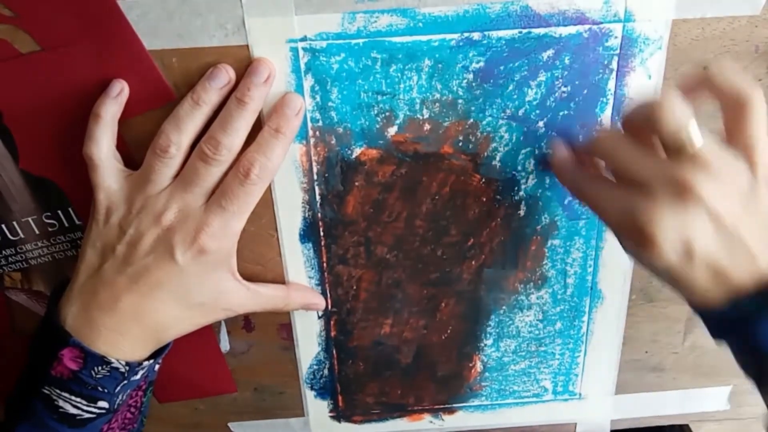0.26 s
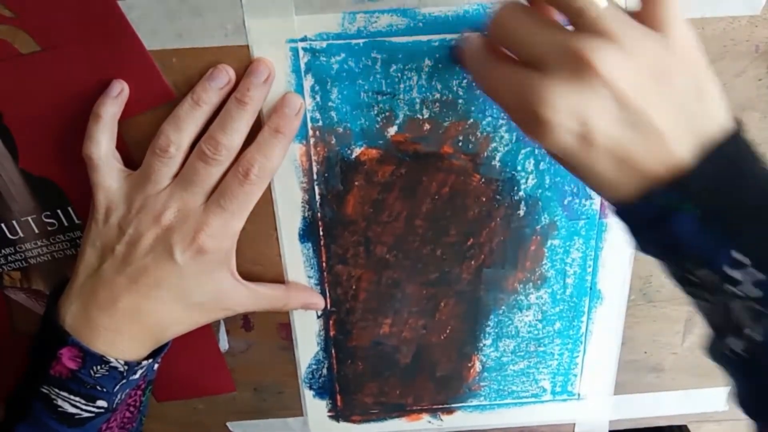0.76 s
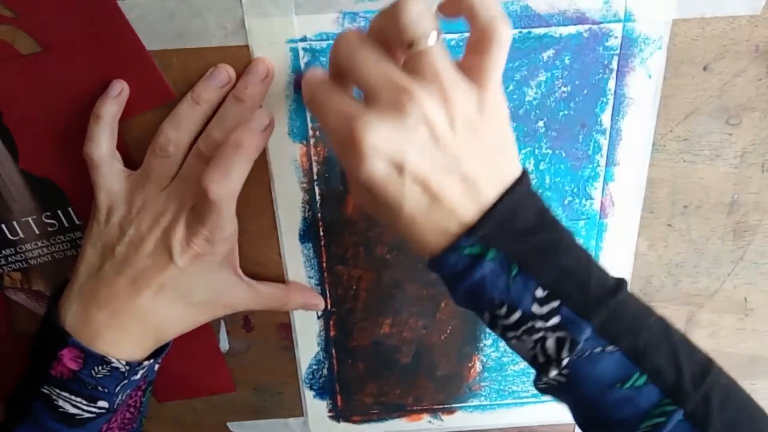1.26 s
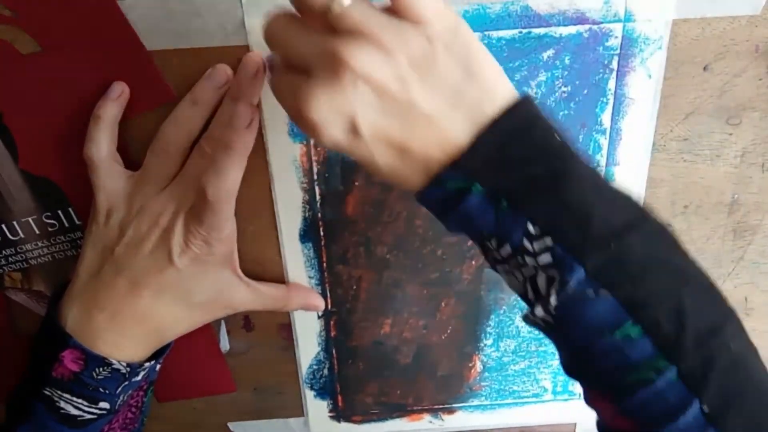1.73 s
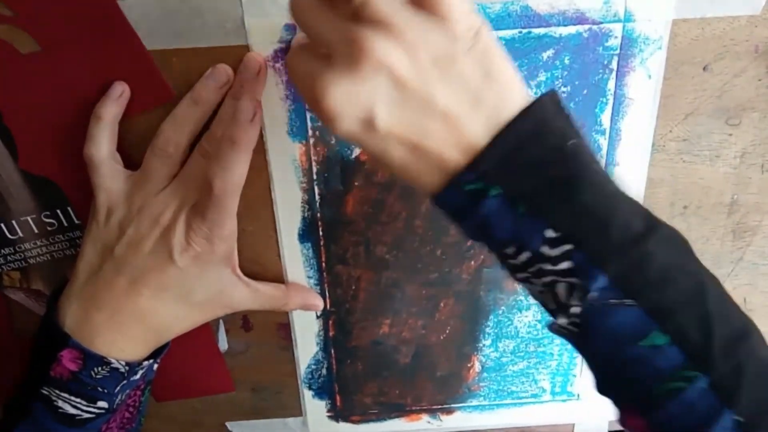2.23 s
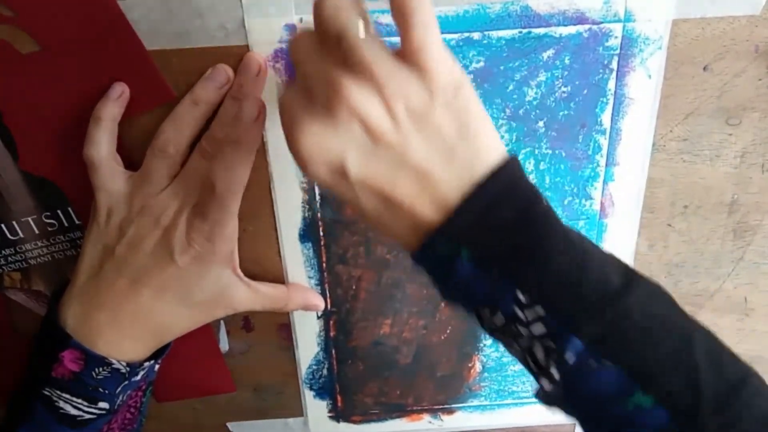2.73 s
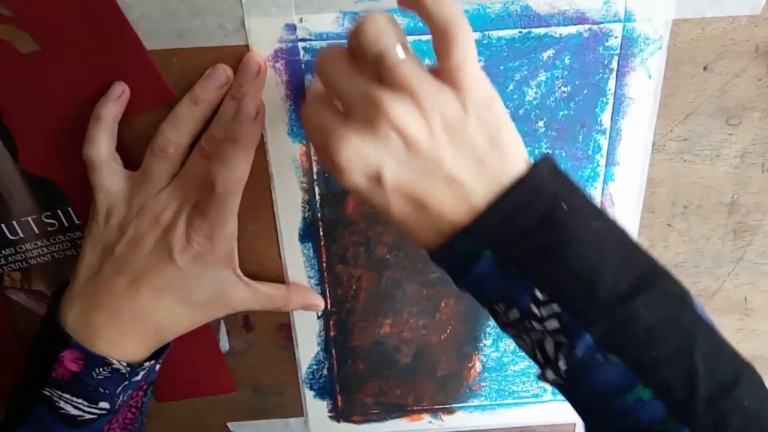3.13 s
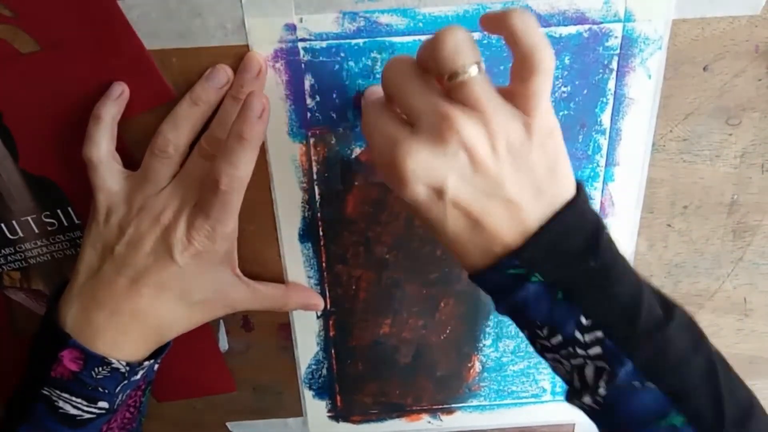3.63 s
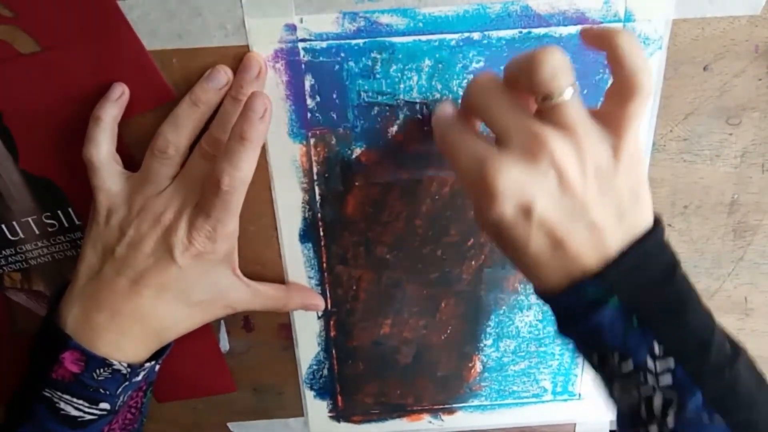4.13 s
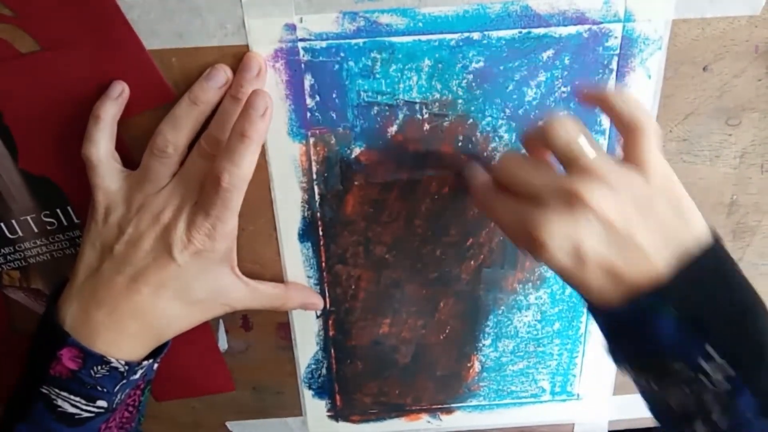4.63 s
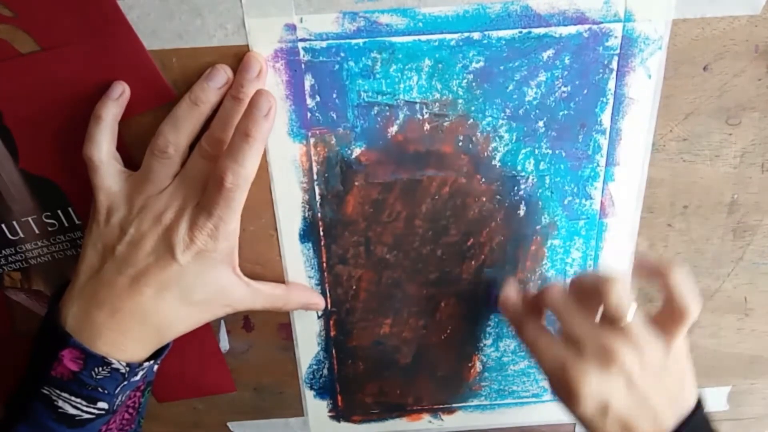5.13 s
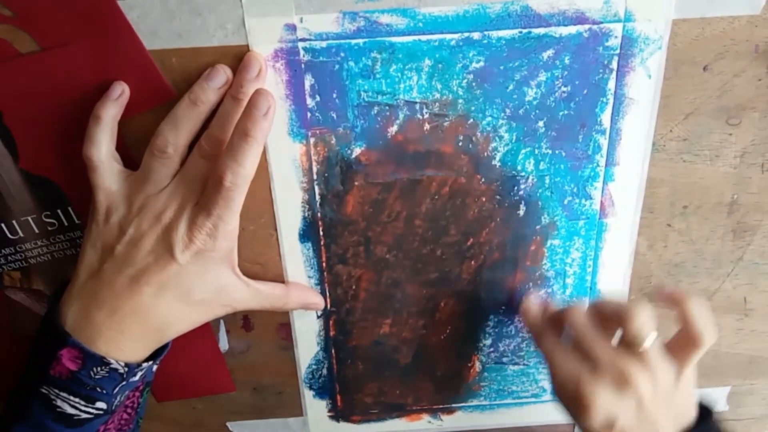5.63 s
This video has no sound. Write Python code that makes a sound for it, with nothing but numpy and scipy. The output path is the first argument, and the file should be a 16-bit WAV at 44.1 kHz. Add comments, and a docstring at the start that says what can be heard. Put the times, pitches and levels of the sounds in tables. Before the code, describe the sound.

A pastel stick scrubs quickly to and fro on paper, with a dry hiss and soft drumming from the wooden table.

```python
"""Close up at a wooden table in a small room, one microphone. A pastel stick scrubs to and fro over
taped-down paper, about seven strokes a second. The paper's tooth crumbles it in a fine hiss that the
moving hand colours; with each push the sheet scuffs and the table top drums and rings. Now and then
the stick knocks at a ridge of pigment. The strokes ease around three seconds, then move towards the
table's edge, where the last are the hardest and the stick clicks, twice faintly and once sharply."""
import sys
import numpy as np
from scipy import signal
from scipy.fft import rfft, irfft, next_fast_len
from scipy.io import wavfile
from scipy.ndimage import uniform_filter1d

SR = 44100
rng = np.random.default_rng(int(sys.argv[2]) if len(sys.argv) > 2 else 0)


def dump_mix(stems):
    """Bounce the given channels to the path in sys.argv[1] as a 16-bit WAV at rate SR."""
    frames = np.atleast_2d(stems).T  # one column per channel
    limited = np.clip(frames, -1, 1)  # hard clip at full scale
    pcm = np.round(limited * 32767).astype(np.int16)
    wavfile.write(sys.argv[1], SR, pcm)


N = 258867

# Strokes, each lasting until the hand's next turn; where the hiss hardly dips, the stick runs on.
# Each row: turn in seconds, dip of the hiss there in dB, hardest push as a share of the stroke,
# then relative levels in dB of hiss, table drum, hollow knock, scuff and rumble.
STROKES = [(0.0, -9.5, 0.09, -64, -42.5, -49, -61, -56.5), (0.054, -3, 0.3, -63.5, -49.5, -58, -71.5, -52),
           (0.18, 8.5, 0.7, -60, -49, -52.5, -58, -54),
           (0.271, -2.5, 0.03, -64.5, -43.5, -55.5, -65, -48.5),
           (0.489, 10, 0.48, -65.5, -51.5, -56, -62.5, -57), (0.655, 8, 0.78, -66, -46, -55.5, -71, -48),
           (0.79, -2, 0.07, -67.5, -51, -53.5, -68, -51.5), (0.933, 0.5, .4, -69.5, -55, -54.5, -74, -67.5),
           (1.047, 14.5, 0.59, -65.5, -48, -59, -71.5, -61.5),
           (1.141, 3, 0.44, -66, -52, -50.5, -61.5, -74),
           (1.289, 10.5, 0.7, -69, -44.5, -52.5, -68.5, -48.5),
           (1.412, 7, 0.34, -64, -47, -49.5, -61.5, -56), (1.583, 11.5, 0.6, -64, -45.5, -53, -70.5, -62),
           (1.744, 7.5, 0.47, -67.5, -52.5, -55.5, -66.5, -56.5),
           (1.894, 11, 0.66, -65, -52.5, -52.5, -63, -48), (2.042, 8, 0.47, -65, -52.5, -53.5, -63.5, -67),
           (2.155, 4, 0.44, -67, -61.5, -57.5, -68, -71), (2.251, 6, 0.39, -65.5, -50, -48.5, -72, -60.5),
           (2.42, 19.5, 0.49, -65, -45, -54.5, -68.5, -56),
           (2.547, 10.5, 0.38, -68.5, -52, -59.5, -73.5, -54),
           (2.673, 14, 0.38, -64, -54.5, -59.5, -75, -61.5), (2.815, 10, 0.37, -69.5, -55, -54, -77, -77),
           (2.953, 12.5, 0.6, -71.5, -55, -60.5, -78.5, -79),
           (3.095, 7, 0.87, -74.5, -62.5, -78, -77.5, -67), (3.254, 6, 0.49, -64.5, -59.5, -76, -73, -65),
           (3.396, 14, 0.5, -65.5, -44, -51, -67, -57.5), (3.542, 17, 0.42, -63.5, -48, -46.5, -62, -52.5),
           (3.671, 11.5, .44, -67, -53.5, -47.5, -64, -53), (3.803, 10, 0.44, -63, -45.5, -47, -62, -54.5),
           (3.933, 3.5, 0.35, -66.5, -49, -50.5, -69.5, -55.5), (4.079, 4, 0.47, -66, -49, -61, -67, -59.5),
           (4.199, 4, 0.47, -67.5, -49, -62.5, -72, -54), (4.385, 14, 0.62, -64, -43, -62.5, -61.5, -46.5),
           (4.545, 13, .55, -62, -37, -45, -54.5, -44), (4.756, 16, 0.59, -63, -40.5, -59, -66.5, -54.5),
           (4.881, 7.5, 0.55, -62.5, -44.5, -49, -56, -54), (5.095, 4, .55, -61, -45, -50, -59, -54.5),
           (5.242, 16.5, 0.46, -58.5, -41.5, -40, -52, -50.5),
           (5.436, 9, 0.49, -57, -47.5, -44.5, -53.5, -45.5), (5.586, 9.5, 0.34, -59, -49, -47, -58.5, -55)]
# Swell and release within a push, for drum, hollow knock, scuff and rumble. Each row: delay, then rise
# and fall before stretching, all in seconds, roundness of the rise and of the fall (1 spike, 2 bell).
PUSH_SHAPES = [(-0.00046, 0.031, 0.045, 2.4, 1.35), (-0.0019, .033, .038, 2.3, 1.78),
               (-0.0016, 0.029, 0.041, 1.56, 1.24), (0.0048, .048, 0.06, 2.4, 1.9)]
# The stick's path over the sheet. Each row: time in seconds, place from 0 (far end) to 1 (table's edge).
STICK_PATH = [(0, 0.46), (.3, 0.59), (.7, 0.22), (1.5, 0.31), (2.5, 0.079), (3.3, 0.16), (3.7, 0.35),
              (4.2, 0.22), (4.6, 0.62), (5.0, 0.76), (5.87, 0.84)]

# The pigment's fine hiss; apart from that, the rows above 13900 Hz add a faint, very high fizz.
# Each row: frequency in Hz, relative level in dB.
HISS_SPECTRUM = [(2500, -42), (4000, -18), (4900, -0.5), (5450, -0.5), (5780, 1.5), (6400, -2.5),
                 (6900, -14), (7500, -24.5), (8200, -34), (13900, -35.5), (15000, -27.5), (15700, -17)]
# The coarse rasp under the hiss. Each row: frequency in Hz, relative level in dB.
RASP_SPECTRUM = [(600, -12.5), (1200, -21), (1750, -6.5), (2150, -10.5), (2600, -4), (3300, 3.5), (3900, 5),
                 (4600, 0), (5600, -5), (7500, -51.5)]
# A thin ring that comes and goes with the stick's angle. Each row: time in seconds, dB against the hiss.
WHISTLE_LEVELS = [(0, -18), (1.9, -18.5), (2.8, -31.5), (3.8, -26), (4.05, -10), (4.3, -16), (4.7, -26.5),
                  (5.87, -20)]
# Reflections off hand, arm and table. Each row: delay in seconds, its swing in seconds, level in dB.
HAND_REFLECTIONS = [(.0004, 0.000085, -6), (.0009, 0.000053, -11), (.0017, 0.00014, -4.5),
                    (.0029, 0.00019, -5.5), (.0046, 0.00027, -8.5)]

# The stick bites into the paper after a turn, knocks at ridges of pigment, and clicks.
# Each row: time in seconds, relative strength in dB.
PAPER_BITES = [(1.062, -59), (1.3017, -52), (1.7567, -58), (2.452, -58), (3.273, -69), (3.69, -53),
               (5.3056, -70)]
RIDGE_KNOCKS = [(0.254, -23), (1.083, -32), (1.355, -29), (1.819, -35), (1.935, -25), (2.469, -26.5),
                (3.841, -24.5), (4.45, -40.5), (4.631, -17.5), (4.65, -26), (4.67, -22.5), (5.178, -39)]
STICK_CLICKS = [(4.512, -51), (4.534, -51.5), (5.1448, -43.5)]

# Resonances. Each row: frequency in Hz, relative level in dB, time to fall 60 dB in seconds.
SHEET_MODES = [(470, 2, 0.11), (540.2, 4, 0.2), (578, -0.5, 0.13), (663.4, -5.5, 0.11), (712, -11, 0.1),
               (801.6, -6.5, 0.1), (921, -11, 0.064), (1091, -8.5, 0.033), (1164, -11.5, 0.038),
               (1261, -15, 0.041), (1514, -15.5, 0.032), (1790, -10, 0.0092)]  # the sheet against the wood
TABLE_MODES = [(113, -10, 0.07), (133.8, -6.5, 0.12), (160.9, -5.5, 0.28), (193.8, -3.5, .09),
               (211.2, -2.5, 0.34), (225.3, -5.5, 0.091)]  # the low ring of the table top
FAR_MODES = [(275.7, 1, 0.16), (289.9, 0.5, 0.13), (340.3, -11.5, .09), (398, -19, 0.063)]  # its hollow upper modes, reached from the far end
EDGE_MODES = [(318.3, 0.5, 0.098), (344.6, 1, 0.18), (364, -4, 0.14), (402.3, -8, 0.11)]  # those reached from the edge
LINGERING_MODES = [(160, -14, 0.53), (210, -2.5, 0.5)]  # its slowest to die, singing on between strokes
STICK_MODES = [(1172, 0, 0.041), (1283, 3.5, 0.017), (1700, -10, 0.03)]  # the pastel stick itself

# The rocking table and the room's air. Each row: frequency in Hz, relative level in dB.
RUMBLE_SPECTRUM = [(20, -36), (36, -20), (50, -7.5), (60, 3.5), (70, -5), (84, 3.5), (101, -13.5),
                   (118, -3), (150, -18.5), (250, -28.5), (800, -77)]
AIR_SPECTRUM = [(20, -12.5), (60, 6.5), (160, -4.5), (300, -4), (600, -17.5), (1500, -18), (5000, -36),
                (8000, -34), (15700, -33)]

LAST_STROKE_END_S, LAST_DIP_DB = 5.83, 15
CREST_PLACE, CREST_FOLLOWS_PUSH = .42, .45  # the hand is fastest here in a stroke, drawn towards the push
PUSH_STRETCH, EASE_DB, EASE_SPEED = 0.74, 2, .25  # stretch is an exponent; the hand eases at low speed
RASP_DB, RASP_FOLLOWS_SCUFF, RASP_TURN_DIP_DB, RASP_LAG_S = -5.0, 0.3, 4, .004
WHISTLE_HZ, WHISTLE_T60_S = 2903, 0.0064
ROCK_DB, ROCK_T60_S, ROCK_LOW_CUT_HZ = 0.76, 0.13, 38
ROOM_T60_S, AIR_DB, CUTOFF_HZ = 0.14, -75.5, 15750


def pastel(speed, hiss_db, rasp_db):
    """Pigment breaks off on the paper's tooth; a faster stick meets more fibres a second."""
    crumbs = hand_reflections(grains(per_s=2200 + 6000 * speed, spread_db=3.5))
    flakes = hand_reflections(grains(per_s=1600 + 4500 * speed, spread_db=4.5))
    # a bite throws off a burst of crumbs that thins out at once
    bite_s = 0.01
    bite = signal.lfilter([1], [1, -np.exp(-1 / (bite_s * SR))], blows(PAPER_BITES))
    hiss_gain = from_db(hiss_db + 0.5) + from_db(-12.0) * bite
    hiss = hiss_gain * steadied(coloured(crumbs, HISS_SPECTRUM), span_s=0.12)
    rasp = from_db(rasp_db - 1.1) * steadied(coloured(flakes, RASP_SPECTRUM), span_s=0.23)
    whistle = steadied(ring(flakes, WHISTLE_HZ, WHISTLE_T60_S), span_s=0.33)
    return hiss + rasp + from_db(hiss_db + in_time(WHISTLE_LEVELS)) * whistle


def hand_reflections(x):
    """Each turn leaves the hand in a new pose, so its reflections comb the hiss differently."""
    turn_s, _ = stroke_spans()
    samples, out = np.arange(N), x
    # a pose holds from just after one turn to just before the next
    held_s = np.column_stack([turn_s + .012, np.append(turn_s[1:], N / SR + 1) - .012]).ravel()
    for delay_s, swing_s, db in HAND_REFLECTIONS:
        pose = np.repeat(rng.uniform(-1.18, 1, len(turn_s)), 2)
        lag = (delay_s + swing_s * np.interp(samples / SR, held_s, pose)) * SR
        out = out + from_db(db) * np.interp(samples - lag, samples, x)
    return out


def stroke_motion():
    """The hand speeds up and slows between turns; gives speed 0-1 and hiss and rasp levels in dB."""
    _, dip_db, push_place, crest_db, _, _, scuff_db, _ = np.transpose(STROKES)
    turn_s, length_s = stroke_spans()
    t, middle_s = np.arange(N) / SR, turn_s + length_s / 2
    stroke = np.maximum(np.searchsorted(turn_s, t, "right") - 1, 0)
    progress = np.clip((t - turn_s[stroke]) / length_s[stroke], 0, 1)
    crest = CREST_PLACE + CREST_FOLLOWS_PUSH * (push_place - CREST_PLACE)
    skew = np.log(.5) / np.log(np.clip(crest, .1, .9))  # puts the sine's top at the crest
    speed = np.sin(np.pi * progress ** skew[stroke])
    dips_db = np.interp(t, np.append(turn_s, LAST_STROKE_END_S), np.append(dip_db, LAST_DIP_DB))
    turn_db = np.interp(t, middle_s, crest_db) - dips_db
    hiss_db = (1 - speed) * turn_db + speed * crest_db[stroke]
    # the rasp grows with hard scuffing, dies further at the turns and lags while the stick digs in
    coarse_db = RASP_DB + RASP_FOLLOWS_SCUFF * np.interp(t, middle_s, scuff_db - crest_db)
    rasp_db = hiss_db + coarse_db - RASP_TURN_DIP_DB * (1 - speed)
    return speed, hiss_db, np.interp(t - RASP_LAG_S, t, rasp_db)


def push_gains(speed):
    """The hand bears down once a stroke and eases at the turns; gains of drum, hollow, scuff, rumble."""
    _, _, place, _, *levels_db = np.transpose(STROKES)
    turn_s, length_s = stroke_spans()
    place = np.clip(place, .1, .9)
    t = np.arange(0, N, step=64) / SR
    # a push stretches with the time it has on either side of its peak
    before, after = (2 * length_s * np.array([place, 1 - place]) / np.median(length_s)) ** PUSH_STRETCH
    easing = from_db(-EASE_DB * np.exp(-speed / EASE_SPEED))
    gains = []
    for peak_db, (delay_s, rise_s, fall_s, rise_round, fall_round) in zip(levels_db, PUSH_SHAPES):
        since_s = t[:, None] - (turn_s + place * length_s + delay_s)
        width_s = np.where(since_s < 0, rise_s * before, fall_s * after)
        roundness = np.where(since_s < 0, rise_round, fall_round)
        power = np.exp(-2 * np.abs(since_s / width_s) ** roundness) @ from_db(peak_db) ** 2
        gains.append(easing * in_time(np.column_stack([t, np.sqrt(power)])))
    return gains


def stroke_spans():
    """Start and length of every stroke in seconds."""
    turn_s = np.array(STROKES)[:, 0]
    return turn_s, np.diff(np.append(turn_s, LAST_STROKE_END_S))


def sheet(speed, scuff, edge):
    """Coarser slips shake the sheet against the wood; near the edge its high modes answer more."""
    shaking = struck(grains(per_s=600 + 1200 * speed, spread_db=1.0), SHEET_MODES)
    bright = signal.sosfilt(signal.butter(2, 950, "high", fs=SR, output="sos"), shaking)
    mix = (1 - edge) * rms_one(shaking) + from_db(-2.5) * edge * rms_one(bright)
    return from_db(0.15) * scuff * steadied(mix, span_s=0.035)


def table_top(speed, drum, hollow, edge):
    """The bumping stick drums on the table top and knocks it at ridges of pigment."""
    bumps = grains(per_s=300 + 600 * speed, spread_db=2.0)
    drumming = from_db(0.76) * drum * steadied(struck(bumps, TABLE_MODES), span_s=0.017)
    # which upper modes answer depends on where the stick presses
    upper = (1 - edge) * struck(bumps, FAR_MODES) + edge * struck(bumps, EDGE_MODES)
    knocking = from_db(0.64) * hollow * steadied(upper, span_s=0.033)
    lingering = steadied(struck(rng.standard_normal(N), LINGERING_MODES), span_s=0.037)
    singing = from_db(-2.0) * stored(drum, t60=LINGERING_MODES[-1][2]) * lingering
    ridges = from_db(-13.0) * struck(blows(RIDGE_KNOCKS), TABLE_MODES)
    return drumming + knocking + singing + ridges


def stick_clicks():
    """Small blows set the stick itself ringing briefly."""
    return from_db(-8.5) * struck(blows(STICK_CLICKS), STICK_MODES)


def table_rocking(weight):
    """The arm's weight rocks the whole table in a low rumble that outlasts each push."""
    low_noise = steadied(coloured(rng.standard_normal(N), RUMBLE_SPECTRUM), span_s=0.018)
    rumble = from_db(ROCK_DB) * stored(weight, ROCK_T60_S) * low_noise
    return signal.sosfilt(signal.butter(3, ROCK_LOW_CUT_HZ, "high", fs=SR, output="sos"), rumble)


def room(x, wet_db):
    """Dense reflections from near walls reach the microphone after the direct sound and die quickly."""
    t = np.arange(SR // 3) / SR
    tail = rng.standard_normal(len(t)) * from_db(-60 * t / ROOM_T60_S) * (t > .003)
    return x + from_db(wet_db) * signal.fftconvolve(x, tail / np.linalg.norm(tail))[:N]


def room_air():
    """Room tone: the quiet air as a steady, mostly low noise."""
    return from_db(AIR_DB) * coloured(rng.standard_normal(N), AIR_SPECTRUM)


def grains(per_s, spread_db):
    """Tiny slips at random moments, most small and a few large."""
    sizes = from_db(spread_db * np.minimum(rng.exponential(1, N), 4)) * rng.choice([-1, 1], N)
    return sizes * (rng.random(N) < per_s / SR)


def blows(rows):
    """One impulse for each row of seconds and dB."""
    time_s, db = np.transpose(rows)
    return np.bincount((time_s * SR).astype(int), from_db(db), N)[:N]


def struck(force, modes):
    """A body answers a force with all its modes, neighbours in opposite sense."""
    return sum((-1) ** k * from_db(db) * ring(force, hz, t60) for k, (hz, db, t60) in enumerate(modes))


def ring(force, hz, t60):
    """One mode: a unit click starts a dying sine of height about 1."""
    radius, angle = from_db(-60 / (t60 * SR)), 2 * np.pi * hz / SR
    return signal.lfilter([0, np.sin(angle)], [1, -2 * radius * np.cos(angle), radius**2], force + 1e-18)


def stored(gain, t60):
    """Energy put into a body leaks away, 60 dB in t60 seconds."""
    keep = from_db(-120 / (t60 * SR))
    return np.sqrt(signal.lfilter([1 - keep], [1, -keep], gain ** 2 + 1e-18))


def coloured(x, spectrum):
    """Filter x by a spectrum and scale to unit power."""
    points, size = np.array(spectrum), next_fast_len(N + 8192)
    hz = np.maximum(np.arange(size // 2 + 1) * SR / size, 1)
    gain = from_db(np.interp(np.log(hz), np.log(points[:, 0]), points[:, 1]))
    return rms_one(irfft(rfft(x, size) * gain, size)[:N])


def steadied(x, span_s):
    """Hold the power of x at 1 over spans of span_s, keeping its faster grain."""
    size = max(int(span_s * SR), 8)
    power = uniform_filter1d(uniform_filter1d(x * x, size), size)
    return x / np.sqrt(np.abs(power) + 1e-12)


def in_time(rows):
    """Join rows of seconds and value by straight lines."""
    return np.interp(np.arange(N) / SR, *np.transpose(rows))


def rms_one(x):
    """Scale to unit power."""
    return x / np.sqrt(np.mean(x ** 2) + 1e-20)


def from_db(db):
    """Decibels to gain."""
    return 10 ** (np.asarray(db) / 20)


def scene():
    """Stick, sheet and table close by, the room's quiet air behind them, in mono."""
    speed, hiss_db, rasp_db = stroke_motion()
    drum, hollow, scuff, weight = push_gains(speed)
    edge = np.clip(in_time(STICK_PATH), 0, 1)
    rubbing = pastel(speed, hiss_db, rasp_db) + sheet(speed, scuff, edge)
    air = room_air()
    drawing = room(rubbing + stick_clicks(), wet_db=-8.5)
    wood = table_top(speed, drum, hollow, edge) + table_rocking(weight)
    return (drawing + wood + air)[None]


def record(dry):
    """The microphone's signal, with the highest treble cut steeply."""
    return signal.sosfilt(signal.ellip(12, .1, 80, CUTOFF_HZ, fs=SR, output="sos"), dry)


dry = scene()
out = record(dry)
dump_mix(out)
```